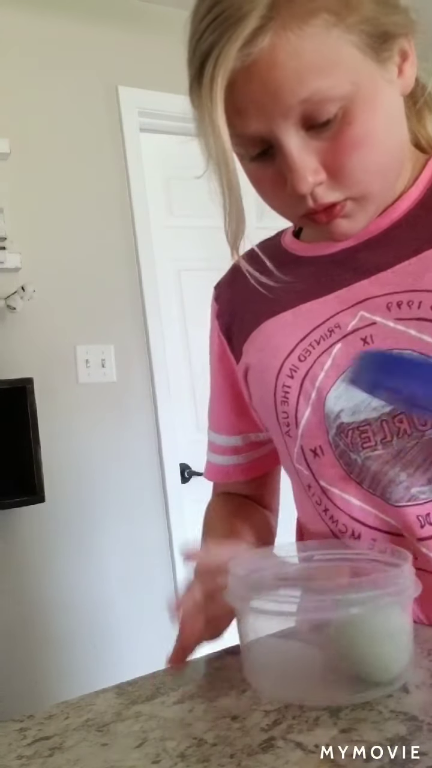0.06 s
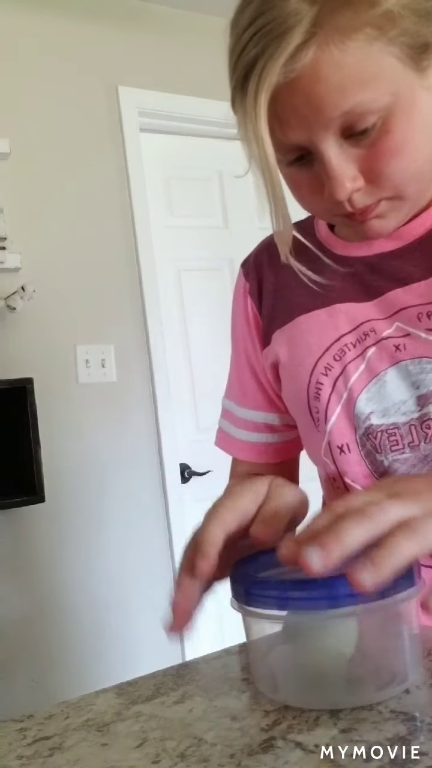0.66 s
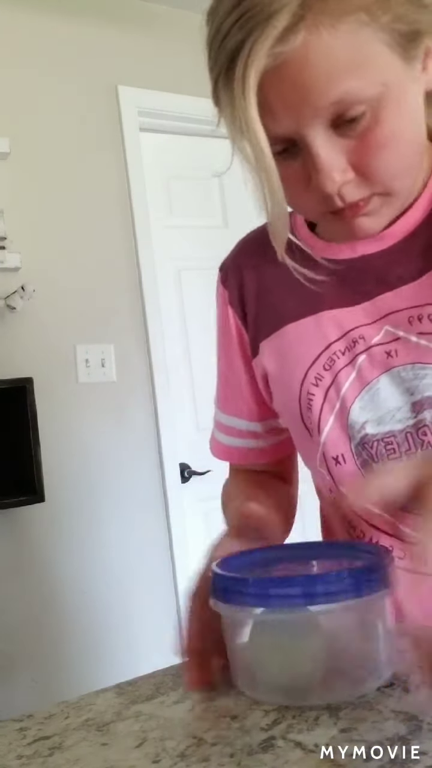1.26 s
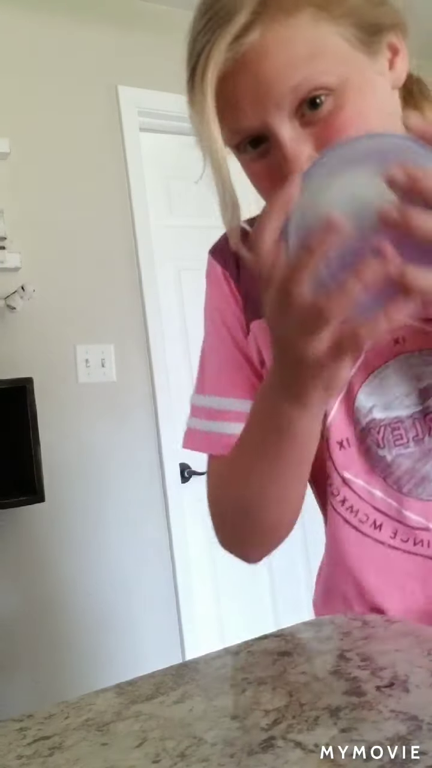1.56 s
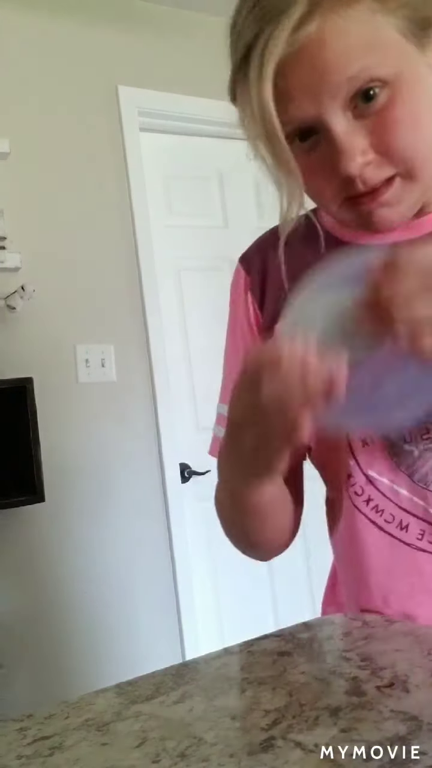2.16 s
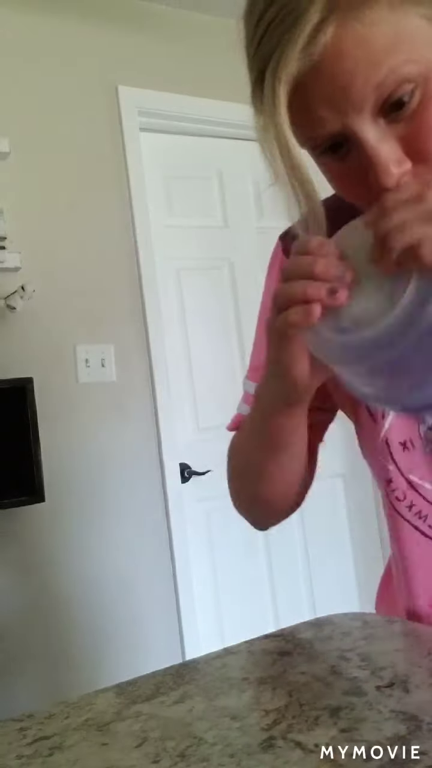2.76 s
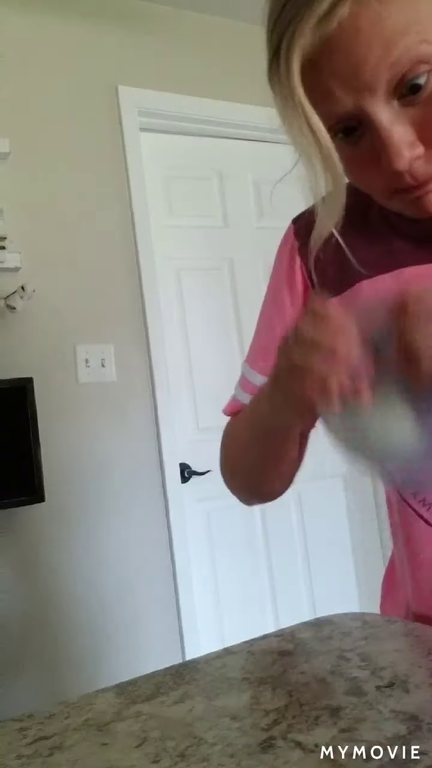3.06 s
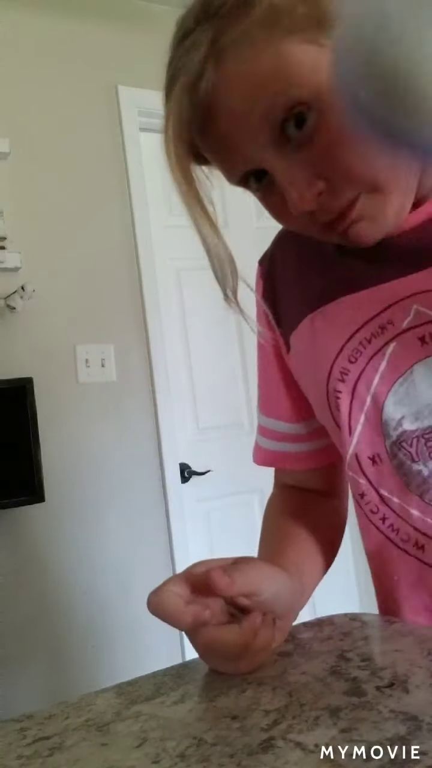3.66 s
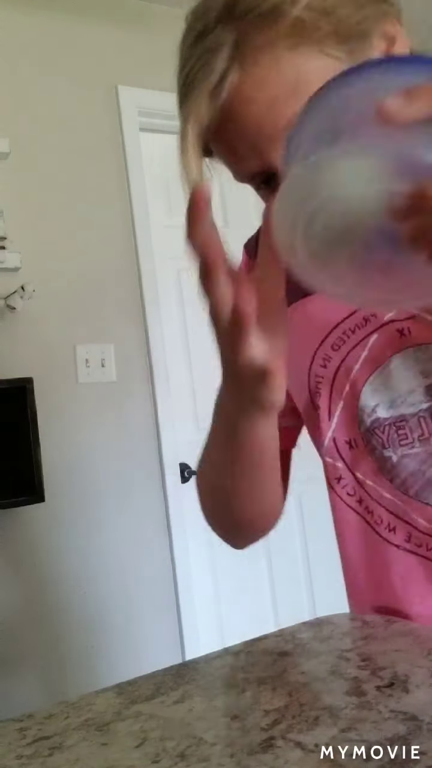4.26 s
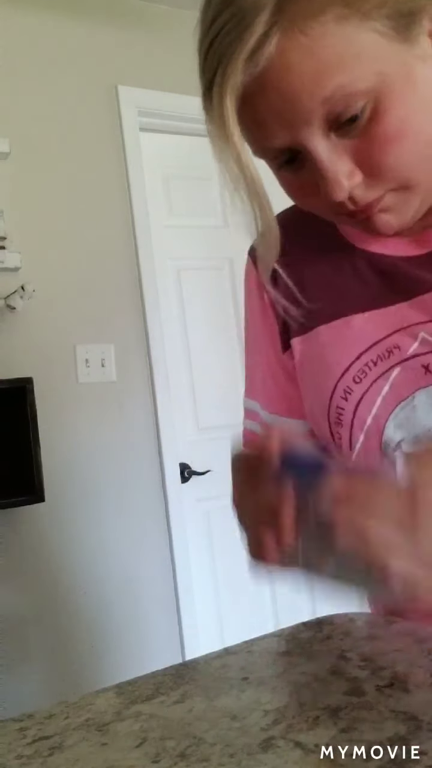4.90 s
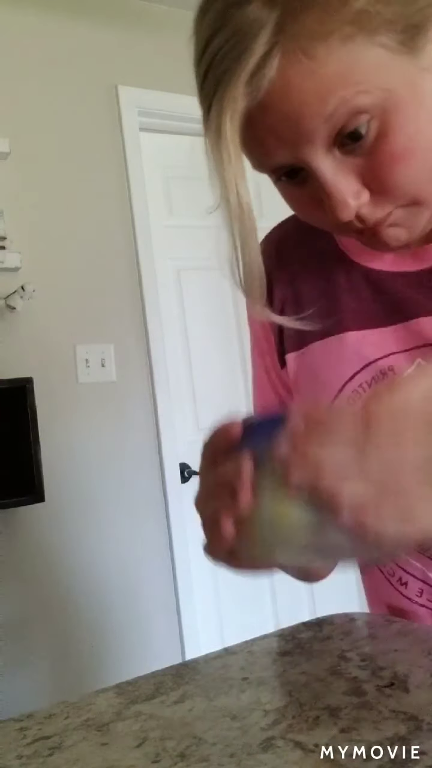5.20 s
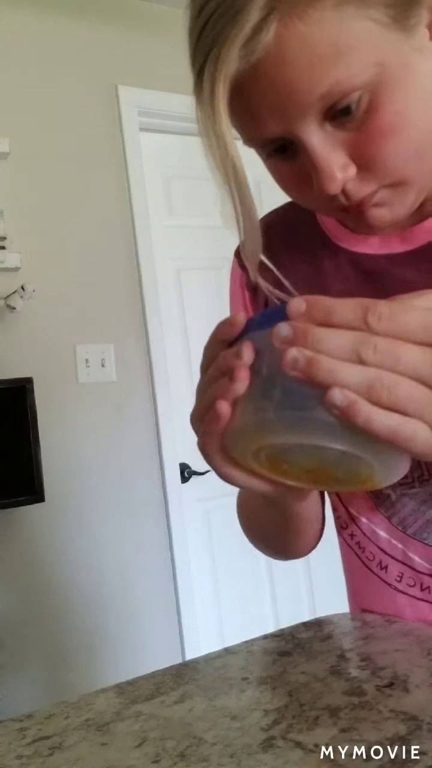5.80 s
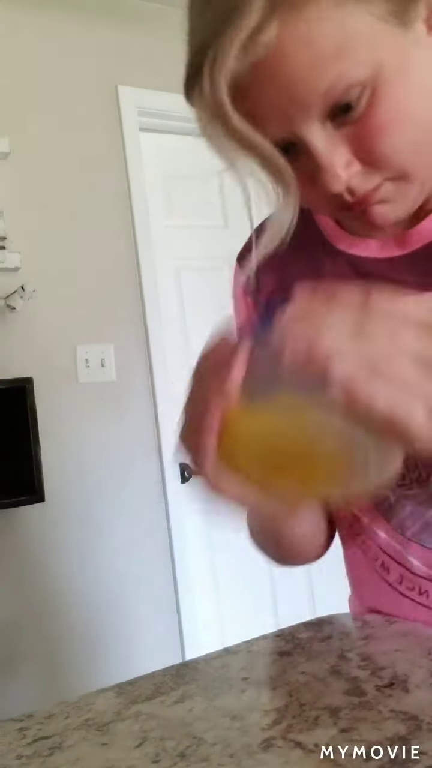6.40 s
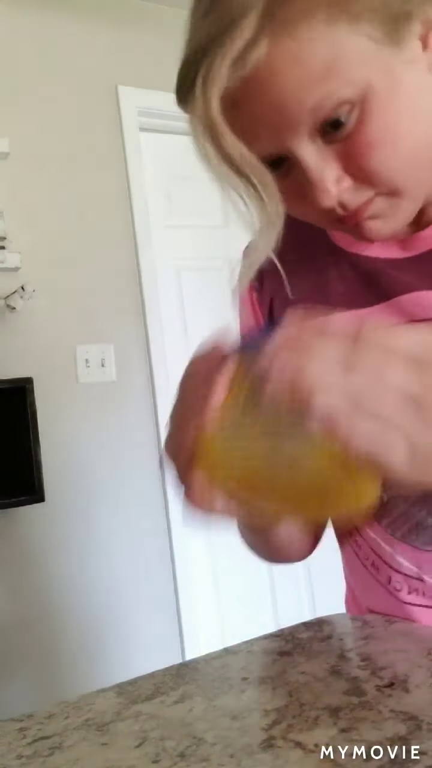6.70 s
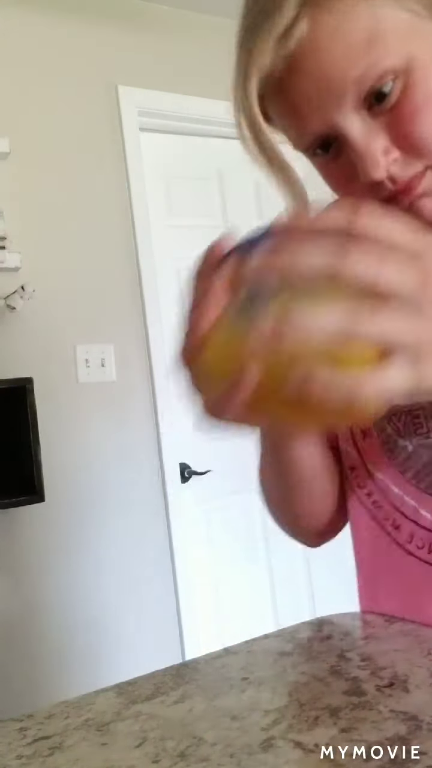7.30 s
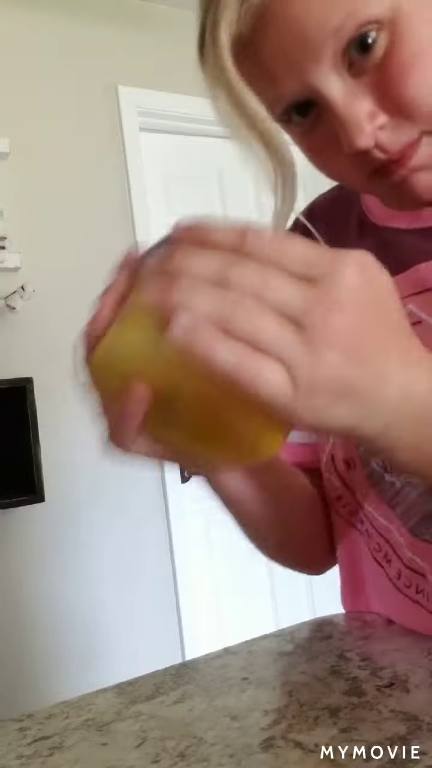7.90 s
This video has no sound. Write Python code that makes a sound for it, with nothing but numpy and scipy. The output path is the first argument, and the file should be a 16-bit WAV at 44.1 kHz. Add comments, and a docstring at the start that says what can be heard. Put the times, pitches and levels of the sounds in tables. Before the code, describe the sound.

Close by in a kitchen, a lid clicks and pops onto a plastic tub on a stone counter and is slapped shut. A raw egg is then shaken hard inside, its shell clacking rapidly and unevenly against the walls. About halfway through it cracks and bursts, and the knocks turn into hollow, wet thumps with small splashes and crunching shell pieces. The room adds a short reverberation.

```python
"""In a kitchen, close by, a lid is set on a plastic tub on a stone counter and slapped shut; then a
raw egg is shaken inside. Each impact excites damped modes of the tub. At first the hard shell
clacks against the walls: short contact, bright sound. Once it has burst, the liquid thumps the
bottom and the lid like a small drum, with splashes of resonating bubbles and a crunch of shell
pieces. The enclosed air rings along, and the room adds a short reverberation."""
import sys
import numpy as np
from scipy import signal
from scipy.fft import rfft, irfft, next_fast_len
from scipy.io import wavfile

SR = 44100
rng = np.random.default_rng(int(sys.argv[2]) if len(sys.argv) > 2 else 0)


def waveform_to_disk(signal):
    """Save audio, clipped to [-1, 1], as 16-bit WAV at the path in sys.argv[1]."""
    frames = np.transpose(np.atleast_2d(signal))
    scaled = np.clip(frames, -1, 1) * 32767
    samples = np.round(scaled).astype(np.int16)
    wavfile.write(sys.argv[1], SR, samples)


N = 355005
TIME = np.arange(N) / SR
AGE = np.arange(int(.2 * SR)) / SR  # seconds since the onset of one short sound


def from_db(db):
    """Amplitude ratio of a level in decibels."""
    return 10 ** (np.asarray(db) / 20)


def rms_one(x):
    """Normalisation to unit mean power."""
    return x / np.sqrt(np.mean(x ** 2) + 1e-20)


def at_level(x, db):
    """Energy normalisation: spread over 10 ms, the sound would have this level."""
    return from_db(db) * x / np.sqrt(np.sum(x ** 2) / (SR / 100) + 1e-20)


def add(track, start_s, sound):
    """Superposition of a sound on the track."""
    i = int(start_s * SR)
    track[i:i + len(sound)] += sound[:N - i]


def fade(t60_s, rise_s):
    """Exponential decay after a smooth onset."""
    return (1 - np.exp(-(AGE / rise_s) ** 2)) * np.exp(-np.log(1000) * AGE / t60_s)


def coloured(x, spectrum):
    """Spectral shaping by a curve of (frequency_hz, gain_db)."""
    hz, db = np.transpose(spectrum)
    size = next_fast_len(len(x))
    freqs = np.maximum(np.fft.rfftfreq(size, 1 / SR), 1)
    gain = from_db(np.interp(np.log(freqs), np.log(hz), db))
    return irfft(rfft(x, size) * gain, size)[:len(x)]


def unevenness(per_s, spread_db):
    """Random modulation: a factor that wanders as a contact tightens and slackens."""
    steps = rng.normal(0, spread_db, int(N / SR * per_s) + 2)
    return from_db(np.interp(TIME * per_s, np.arange(len(steps)), steps))


def grains(per_s, spread_db, size):
    """A Poisson process of tiny snaps of uneven strength."""
    born = rng.random(size) < per_s / SR
    signs = rng.choice([-1, 1], size)
    return born * signs * from_db(spread_db * np.minimum(rng.exponential(1, size), 4))


def resonate(x, hz, width_hz):
    """A second-order resonance with unit peak gain."""
    r = np.exp(-np.pi * width_hz / SR)
    feedback = [1, -2 * r * np.cos(2 * np.pi * hz / SR), r * r]
    return signal.lfilter(np.array([1, 0, -1]) * (1 - r * r) / 2, feedback, x)


def gliding_resonance(x, curve, width_hz):
    """A time-varying resonance: it follows (time_s, pitch_hz) and wavers with the grip of the hands."""
    hz = np.interp(TIME, *np.transpose(curve)) * unevenness(per_s=12, spread_db=.5)
    carrier = np.exp(2j * np.pi * np.cumsum(hz) / SR)
    r = np.exp(-np.pi * width_hz / SR)
    return 2 * np.real(carrier * signal.lfilter([1 - r], [1, -r], x / carrier))


def struck(modes, tuning, rise_s, sag=0):
    """Modal ringing: the contact point weights and damps each mode; a moving load bends the pitch."""
    strengths, dampings = np.exp(rng.normal(0, [[.3], [.2]], (2, len(modes))))
    turns = tuning * np.cumsum(1 + sag * (np.exp(-AGE / .0072) - .5)) / SR
    return sum(strength * from_db(db) * np.sin(2 * np.pi * f * turns) * fade(t60_s / damping, rise_s)
               for strength, damping, (f, db, t60_s) in zip(strengths, dampings, modes))


def bubbles(delays_s, pitches_hz, cycles):
    """Bubble resonance: each falls 60 dB in `cycles` periods and rises a little in pitch as it opens."""
    turns = np.maximum(AGE - delays_s[:, None], 0) * pitches_hz[:, None]
    strengths = from_db(rng.normal(0, 4, (len(delays_s), 1)))
    bend = 1 + .05 * np.minimum(turns / cycles, 1)
    decay = np.exp(-np.log(1000) * turns / cycles)
    return np.sum(strengths * np.sin(2 * np.pi * turns * bend) * decay, axis=0)


# Spectrum of the still room: frequency_hz, gain_db
AIR_SPECTRUM = [(40, -13), (180, -26.5), (460, -4.5), (900, -25), (4200, -19.5), (6000, -25.5),
                (16000, -37.5)]
def room_air():
    """Stationary broadband noise: the still air of the room."""
    return from_db(-79) * rms_one(coloured(rng.standard_normal(N), AIR_SPECTRUM))


# Spectrum of a faint rumble at the start: frequency_hz, gain_db
LOW_SPECTRUM = [(25, -19.5), (60, 5), (100, 0), (180, -1.5), (900, -72)]
def low_rumble(start_db=-63, fall_db_per_s=16):
    """Low-frequency noise in exponential decay."""
    noise = rms_one(coloured(rng.standard_normal(N), LOW_SPECTRUM))
    return noise * from_db(start_db - fall_db_per_s * TIME)


# Spectrum of the diffuse tail: frequency_hz, gain_db
TAIL_SPECTRUM = [(80, 2), (200, 5.5), (400, 2.5), (700, -4.5), (1100, -1.5), (3000, 2), (7000, 0),
                 (15000, 4.5)]
# Echoes from body, counter and cupboards: delay_s, gain_db
REFLECTIONS = [(.0036, -29), (.0068, -21.5), (0.0115, -14), (0.017, -19.5)]
def kitchen(x, t60_s, treble_t60_s, tail_db):
    """Reverberation: direct sound, early reflections and a diffuse tail whose treble dies first."""
    t = TIME[:int(.6 * SR)]
    noise = coloured(rng.standard_normal(len(t)), TAIL_SPECTRUM)
    low = signal.sosfiltfilt(signal.butter(2, 5000, fs=SR, output="sos"), noise)
    tail = low * from_db(-60 * t / t60_s) + (noise - low) * from_db(-60 * t / treble_t60_s)
    tail *= 1 - np.exp(-(t / .0051) ** 2)
    response = from_db(tail_db) * tail / np.sqrt(np.sum(tail ** 2))
    response[0] = 1
    for delay_s, db in REFLECTIONS:
        response[int(delay_s * SR)] += from_db(db)
    return signal.fftconvolve(x, response)[:N]


# Hollow tone of the tub: time_s, pitch_hz
CAVITY_PITCH = [(3.3, 582), (4.2, 477.6), (4.6, 450.7)]
def tub_cavity(x):
    """Cavity resonance: the enclosed air rings on, sinking as the egg spreads over the walls."""
    ringing = x + from_db(-3.5) * gliding_resonance(x, CAVITY_PITCH, width_hz=20)
    bass_loss = signal.butter(1, 110, "high", fs=SR, output="sos")  # a small tub radiates little bass
    return signal.sosfilt(bass_loss, ringing)


# Spectrum of hard contacts on shell and plastic: frequency_hz, gain_db
BRITTLE_SPECTRUM = [(900, -37.5), (1600, -2.5), (2400, -0.5), (3900, 0), (5500, -1.5), (7400, -2.5),
                    (8500, -14), (9600, -15.5), (11300, -9), (13500, -17.5), (16000, -21)]
def brittle(x):
    """Brief, hard contacts carry their energy mainly in the treble."""
    return coloured(x, BRITTLE_SPECTRUM)


def crack(hz, envelope, ring_db=10.5, width_hz=275):
    """Brittle snaps excite one damped resonance, by default as sharp as that of a piece of shell."""
    snaps = brittle(grains(per_s=14000, spread_db=.98, size=len(AGE)))
    return (snaps + from_db(ring_db) * resonate(snaps, hz, width_hz)) * envelope


# Spectrum of the slapped tub: frequency_hz, gain_db
SLAP_SPECTRUM = [(400, -21.5), (620, 12.5), (950, -0.5), (1280, -1), (1600, -19), (2600, -25.5),
                 (5000, -43)]
def slap(t60_s, rise_s):
    """Modal overlap: the crowded, heavily damped middle modes of the tub merge into noise."""
    return coloured(rng.standard_normal(len(AGE)), SLAP_SPECTRUM) * fade(t60_s, rise_s)


# Modes of the lid and the loaded bottom: pitch_ratio, level_db, t60_s
DRUM_MODES = [(0.691, -9, 0.097), (0.998, 16.5, 0.034), (1.379, -3.5, 0.057)]
def drum(hz, rise_s, sag=0, decay_scale=1):
    """Inharmonic modes: an end of the tub vibrates like a small drumhead."""
    modes = [(ratio, db, t60_s * decay_scale) for ratio, db, t60_s in DRUM_MODES]
    return struck(modes, hz, rise_s, sag)


# Spectrum of the rubbed wall: frequency_hz, gain_db
RUB_SPECTRUM = [(40, -32), (130, -15.5), (260, -1.5), (480, 1.5), (1100, -12.5), (5000, -36)]
# Rubbing and rolling of hands, lid and contents: start_s, end_s, rumble_db, swish_db
RUBS = [(0, 0.111, -64.5, -60.5), (0.382, 0.5, -44, -48), (1.187, 1.417, -53, -58),
        (1.548, 1.658, -69, -67), (1.698, 2.31, -54.5, -61), (2.382, 3.247, -51, -57),
        (3.356, 3.444, -51.5, -57), (3.464, 3.751, -43.5, -52.5), (3.83, 4.294, -49.5, -58),
        (4.414, 4.6, -58, -61), (4.612, 4.664, -38.5, -40), (4.794, 5.447, -54.5, -61),
        (6.02, 6.127, -67.5, -72), (6.163, 8.05, -50.5, -58)]
def rubbing(attack_s=.0038, release_db_per_s=136.5):
    """Sliding friction under uneven pressure gives a low rumble and a soft, grainy swish."""
    pressure = unevenness(per_s=60, spread_db=3)
    rumble = rms_one(coloured(rng.standard_normal(N), RUB_SPECTRUM) * pressure)
    grit = brittle(grains(per_s=4000, spread_db=3.5, size=N))
    swish = rms_one(grit * pressure * unevenness(per_s=200, spread_db=1.5))
    out = np.zeros(N)
    for start_s, end_s, rumble_db, swish_db in RUBS:
        attack = np.clip((TIME - start_s) / attack_s, 0, 1)
        release = from_db(-release_db_per_s * np.maximum(TIME - end_s, 0))
        out += attack * release * (from_db(rumble_db) * rumble + from_db(swish_db) * swish)
    return out


# Chains of bubbles: start_s, length_s, first_hz, last_hz, level_db
BUBBLE_CHAINS = [(2.26, 0.034, 590, 1400, -50), (2.929, 0.022, 625, 1340, -43),
                 (3.069, 0.032, 625, 1310, -42), (3.606, 0.049, 2310, 1106, -48.5)]
def squelches(count=12, gain_db=7.5):
    """A liquid film squeezed along the wall sheds a gliding run of bubble resonances."""
    out = np.zeros(N)
    for start_s, length_s, first_hz, last_hz, db in BUBBLE_CHAINS:
        along = np.linspace(0, 1, count) + rng.normal(0, .04, count)
        pitches = first_hz * (last_hz / first_hz) ** along * np.exp(rng.normal(0, .05, count))
        add(out, start_s, at_level(bubbles(along * length_s, pitches, cycles=11), db + gain_db))
    return out


PIECE_HZ = 3006  # tone of the shell pieces under an average slap
# Ticks of loose bits: start_s, level_db
TICKS = [(4.1432, -42.5), (4.339, -41.5), (4.8223, -38.5), (5.0525, -44), (6.3965, -43.5), (6.659, -34.5),
         (7.1013, -48), (7.4225, -44.5), (7.5778, -36.5), (7.669, -47)]
def loose_bits():
    """Light impacts: single pieces of wet shell tick on the wall and ring briefly."""
    out = np.zeros(N)
    for start_s, db in TICKS:
        tick = crack(PIECE_HZ * rng.uniform(1, 2), fade(t60_s=.017, rise_s=.00032))
        add(out, start_s, at_level(tick, db))
    return out


# Tone of the lid, falling as it closes the air in: time_s, pitch_hz
LID_TONE = [(.19, 1030), (.31, 810), (.336, 650), (.49, 560), (.58, 535), (1.01, 428)]
def lid_scrape(start_s=.375, end_s=.51, level_db=-39.5):
    """Stick-slip friction: the lid twists along the rim, and each slip rings its hollow tone."""
    slips = grains(per_s=120, spread_db=1, size=N) * (TIME > start_s) * (TIME < end_s)
    tone = gliding_resonance(slips, LID_TONE, width_hz=70)
    active_share = (end_s - start_s) * SR / N
    return from_db(level_db) * rms_one(tone) * np.sqrt(active_share)


# Modes of the stiff rim: nominal_hz, level_db, t60_s
RIM_MODES = [(2897, 3.5, 0.012), (3180, 5.5, 0.027), (4340, 9.5, 0.014), (5630, -0.5, 0.0073)]
# Modes of the tub under the seated lid: nominal_hz, level_db, t60_s
TUB_MODES = [(1036, 1, 0.018), (1390, -2.5, .015), (1700, -3.5, 0.013)]
# The lid meeting the rim: start_s, pop_db, click_db
LID_CONTACTS = [(.16, -31.5, -39), (.185, -36, -43.5), (.312, -34, -35.5), (.3285, -35.5, -23.5),
                (.336, -15, -29.5), (.345, -29, -34.5), (.422, -42, -50), (.439, -47.5, -59.5),
                (.492, -25.5, -33), (.532, -31, -40), (.548, -35.5, -53), (.581, -43.5, -53),
                (.989, -26, -25), (.996, -43.5, -26), (1.006, -26, -22.5), (1.018, -28, -35.5)]
def lid_closing(seated_s=.4):
    """Impulsive excitation: the lid pops and the rim clicks; once seated, the lid knocks the tub too."""
    out = np.zeros(N)
    for start_s, pop_db, click_db in LID_CONTACTS:
        pop = drum(np.interp(start_s, *np.transpose(LID_TONE)), rise_s=.00054)
        add(out, start_s, at_level(pop, pop_db))
        knock = struck(TUB_MODES, tuning=.95, rise_s=.0004)
        add(out, start_s, (start_s > seated_s) * at_level(knock, pop_db - 2))
        snap = brittle(rng.standard_normal(len(AGE))) * fade(t60_s=.025, rise_s=.0002)
        grip = np.exp(rng.normal(0, .04))  # the fingers retune the rim
        ring = struck(RIM_MODES, grip, rise_s=.0002)
        add(out, start_s, at_level(snap, click_db - 3) + at_level(ring, click_db - 2.5))
    return out


# Modes of the tub standing on the counter: nominal_hz, level_db, t60_s
COUNTER_MODES = [(96.1, -7.5, 0.039), (118, 4, 0.042), (156, -1.5, 0.074), (250, -3.5, 0.068),
                 (274, 0, .06), (359, 0, 0.12)]
# The palm driving the lid home: start_s, thud_db, buzz_db
PALM_BLOWS = [(0.989, -24.5, -27), (0.999, -27, -30), (1.013, -22, -21)]
def palm_blows():
    """A soft impact excites the low modes of the tub on the counter, with a buzz and a clap."""
    out = np.zeros(N)
    for start_s, thud_db, buzz_db in PALM_BLOWS:
        thud = struck(COUNTER_MODES, tuning=.99, rise_s=.0021)
        add(out, start_s, at_level(thud, thud_db))
        buzz = brittle(rng.standard_normal(len(AGE))) * fade(t60_s=.27, rise_s=.001)
        clap = slap(t60_s=.22, rise_s=.001)
        add(out, start_s, at_level(buzz, buzz_db) + at_level(clap, buzz_db - 2.5))
    return out


# Modes of the wall: nominal_hz, level_db, t60_s
WALL_MODES = [(253, 3.5, 0.051), (320, 11, 0.03), (397.5, 16.5, 0.026), (479, 16, 0.028), (620, 8.5, 0.045)]
# The hard shell striking the wall: start_s, crack_db, thump_db, ping_hz
SHELL_IMPACTS = [(1.2044, -32, -45, 6100), (1.3703, -24, -35.5, 2830), (1.5969, -31.5, -31.5, 2700),
                 (1.6447, -26.5, -43.5, 4840), (1.684, -19.5, -35.5, 5150), (1.766, -19, -33.5, 2170),
                 (1.8408, -22.5, -44, 2450), (1.8731, -23.5, -36.5, 4500), (1.8929, -32.5, -38.5, 2020),
                 (1.971, -23, -33.5, 2430), (2.0084, -14, -30.5, 5530), (2.1038, -25.5, -32.5, 3130),
                 (2.2189, -32.5, -55, 4360), (2.2404, -27, -39.5, 3220), (2.3128, -40, -51.5, 4460),
                 (2.3765, -24.5, -30, 7300), (2.389, -24.5, -51, 7500), (2.4031, -17, -25, 6000),
                 (2.4534, -13, -24.5, 4000), (2.473, -20.5, -29, 4600), (2.5299, -21, -38, 2420),
                 (2.589, -26.5, -33.5, 3740), (2.6192, -22.5, -30.5, 2200), (2.6644, -23.5, -42.5, 2080),
                 (2.7099, -28, -37.5, 2450), (2.7475, -25, -34.5, 2600), (2.7803, -20, -27, 6500),
                 (2.8288, -21.5, -31.5, 2330), (2.8687, -29.5, -31.5, 2470), (2.897, -27.5, -39.5, 2560),
                 (2.9174, -26.5, -35, 4700), (2.93, -27, -31.5, 6100), (2.986, -24, -32, 2600),
                 (3.026, -27, -35.5, 2440), (3.052, -20.5, -30, 3930), (3.0767, -25, -31, 3200),
                 (3.13, -24, -37.5, 2450), (3.1895, -32, -38.5, 3130), (3.2161, -27, -37.5, 2420),
                 (3.27, -31.5, -39, 3300), (3.3976, -20.5, -37, 2930), (3.4702, -12.5, -18.5, 5000),
                 (3.4992, -16, -31.5, 3320), (3.5055, -20, -30, 4940), (3.553, -22.5, -32, 3340),
                 (3.5928, -15.5, -29, 5850), (3.6289, -33.5, -35, 2650), (3.6704, -23.5, -36, 2400),
                 (3.684, -24.5, -31, 2520), (3.7061, -32, -50, 3000), (3.7863, -27, -46.5, 3300),
                 (3.858, -15, -25, 3270), (3.9067, -19.5, -43.5, 6000), (3.935, -20.5, -31.5, 3330),
                 (3.9889, -19, -32.5, 4800), (4.0754, -14.5, -45, 3980), (4.0779, -8, -19, 5930),
                 (4.1916, -16.5, -32, 3360), (4.2824, -18, -27.5, 3050), (4.6111, -33, -24.5, 3420),
                 (4.6137, -12.5, -26.5, 7050), (4.628, -19.5, -36.5, 8000)]
def shell_knocks(crack_gain_db=-14, thump_gain_db=-1, knock_hz=782):
    """Short contact, wide spectrum: a crack and a little crumbling over the dull thump of the wall."""
    out = np.zeros(N)
    crumbling = from_db(-21.5) * fade(t60_s=.027, rise_s=.00098)
    envelope = fade(t60_s=.0027, rise_s=.00063) + crumbling
    mean_thump_db = np.mean(SHELL_IMPACTS, axis=0)[2]
    for start_s, crack_db, thump_db, ping_hz in SHELL_IMPACTS:
        grip = np.exp(rng.normal(0, .1))  # the hands retune the wall
        thump = struck(WALL_MODES, grip, rise_s=.0011)
        add(out, start_s, at_level(thump, thump_db + thump_gain_db))
        knock = np.sin(2 * np.pi * knock_hz * grip ** 2 * AGE) * fade(t60_s=.013, rise_s=.00026)
        add(out, start_s, at_level(knock, -40 + .45 * (thump_db - mean_thump_db)))
        clack = crack(ping_hz, envelope, ring_db=9, width_hz=190)  # the plastic rings where it is hit
        add(out, start_s, at_level(clack, crack_db + crack_gain_db))
    return out


# The shell caves in, then bursts: start_s, level_db, t60_s
FRACTURES = [(4.08, -28.5, 0.036), (4.611, -26.5, 0.1)]
def shell_breaking():
    """Brittle fracture: cracks run through the shell in a dense, bright, dying crackle."""
    out = np.zeros(N)
    for start_s, db, t60_s in FRACTURES:
        crackle = brittle(grains(per_s=3700, spread_db=7.5, size=len(AGE)))
        crackle += from_db(11) * resonate(crackle, hz=7800, width_hz=1300)
        add(out, start_s, at_level(crackle * fade(t60_s, rise_s=.00064), db))
    return out


def air_pocket(length_s, low_hz, high_hz):
    """A shrinking cavity rises in pitch: air trapped under the liquid chirps until it closes."""
    progress = np.minimum(AGE / length_s, 1)
    phase = 2 * np.pi * np.cumsum(low_hz + (high_hz - low_hz) * progress) / SR
    return np.sin(phase) * np.sin(np.pi * np.sqrt(progress))


def shell_clump(tone_hz):
    """Many tiny impacts merge into the ragged crunch of a clump of shell pieces."""
    knots = AGE[::50]
    ragged = from_db(np.interp(AGE, knots, rng.normal(0, 5, len(knots))))
    return crack(tone_hz * np.exp(rng.normal(0, .16)), ragged * fade(t60_s=.024, rise_s=.00052))


def spatter(lag_s, count=10):
    """Drops ring as bubbles just after the bulk lands; each landing favours one size, hence one pitch."""
    delays = lag_s * rng.gamma(3, 1, count)
    typical_hz = np.exp(rng.uniform(np.log(1700), np.log(5500)))
    pitches = typical_hz * np.exp(rng.normal(0, .35, count))
    return bubbles(delays, pitches, cycles=14)


# Tone of the froth: time_s, typical_hz
FROTH_PITCH = [(5.3, 995), (6.3, 2570)]
def froth(start_s, lag_s=.017, count=10):
    """Smaller bubbles ring higher: air beaten into the egg pops in an ever finer froth."""
    typical_hz = np.interp(start_s, *np.transpose(FROTH_PITCH))
    pitches = typical_hz * np.exp(rng.normal(0, .35, count))
    return bubbles(lag_s * rng.gamma(2, 1, count), pitches, cycles=20)


# Crunch of an average landing as the shell is ground into more pieces: time_s, level_db
CRUNCH_GROWTH = [(4.3, -54), (5.4, -46.5), (6.2, -41.5), (8, -40.5)]
# The burst egg landing at each end of a stroke: start_s, boom_db, pitch_hz, slap_db
LANDINGS = [(4.085, -15, 412, -35), (4.287, -29.5, 444, -39), (4.338, -24, 441, -44),
            (4.427, -33, 453, -48.5), (4.6, -26.5, 362, -21), (4.6125, -11.5, 404, -18.5),
            (4.623, -21, 446, -38.5), (4.796, -20.5, 402, -34.5), (4.817, -27, 388, -41),
            (4.888, -17.5, 443, -21.5), (5.018, -20, 486, -39), (5.051, -25, 390, -42),
            (5.107, -13.5, 408, -21), (5.214, -20.5, 397, -40.5), (5.22, -14.5, 419.6, -28.5),
            (5.284, -14, 447, -23), (5.364, -18, 394, -33.5), (5.421, -19, 392, -38.5),
            (5.505, -27.5, 370, -76.5), (5.557, -25.5, 428, -49), (6.063, -24, 377, -52),
            (6.142, -15.5, 391, -29), (6.148, -28, 363, -20), (6.271, -11.5, 387, -36.5),
            (6.344, -15, 429, -26.5), (6.429, -12.5, 367, -35.5), (6.503, -18.5, 363, -19),
            (6.599, -10, 369, -44.5), (6.651, -19, 375, -25), (6.73, -13, 371, -46.5),
            (6.784, -20, 393, -20), (6.874, -20, 496, -36), (6.923, -20.5, 354, -37),
            (7.025, -13.5, 379, -44.5), (7.084, -27.5, 363, -30.5), (7.2, -19, 387, -37),
            (7.251, -20, 370, -30), (7.339, -15.5, 528, -44.5), (7.408, -27.5, 364, -33),
            (7.505, -14.5, 335, -57.5), (7.584, -20, 399, -27.5), (7.676, -10.5, 386, -28),
            (7.726, -11, 360, -33), (7.805, -21, 520, -51.5), (7.857, -16, 384, -27),
            (7.959, -21, 358, -44.5), (8.014, -25.5, 540, -30.5)]
def wet_knocks(hardening=.23, octaves_per_db=.6, late_loss_db_per_s=409):
    """Liquid impact drives the tub like a drum; shell and drops follow, louder for a harder landing."""
    out = np.zeros(N)
    times, booms, _, slaps = np.transpose(LANDINGS)
    force_db = .38 * booms + .4 * slaps
    crunches = np.interp(times, *np.transpose(CRUNCH_GROWTH)) + force_db - force_db.mean()
    for (start_s, boom_db, hz, slap_db), crunch_db in zip(LANDINGS, crunches):
        softness, pocket_tuning = np.exp(rng.normal(0, [.25, .1]))
        # the contact shortens as the slap gains on the boom
        softness *= from_db(-hardening * (slap_db - boom_db - np.mean(slaps - booms)))
        held = min(1, (450 / hz) ** 4)  # the highest notes come from spots that the fingers damp
        boom = drum(hz, rise_s=.0023 * softness * held, sag=rng.normal(.1, .13), decay_scale=held)
        wall = struck(WALL_MODES, tuning=1, rise_s=.00072)
        add(out, start_s, at_level(boom, boom_db - 7) + at_level(wall, boom_db - 21))
        chirp = air_pocket(.00536 * softness, 520 * pocket_tuning, 1500 * pocket_tuning)
        smack = slap(t60_s=.02, rise_s=.0067)
        add(out, start_s, at_level(chirp, slap_db - 5.5) + at_level(smack, slap_db - 8))
        tone_hz = PIECE_HZ * 2 ** (octaves_per_db * (slap_db - slaps.mean()))  # harder rings higher
        for lag_s in np.array([0, .003, .007]) * softness:
            clump_db = crunch_db - late_loss_db_per_s * lag_s
            add(out, start_s + lag_s, at_level(shell_clump(tone_hz), clump_db))
        add(out, start_s, at_level(spatter(lag_s=.0028 * softness), crunch_db + 2))
        add(out, start_s, at_level(froth(start_s), crunch_db - 11))
    return out


def scene():
    """Superposition of the closing and the shaking, each reverberated, over the room's background."""
    closing = lid_closing() + palm_blows() + lid_scrape()
    on_counter = kitchen(closing, t60_s=.46, treble_t60_s=.33, tail_db=-6.5)
    shaking = shell_knocks() + shell_breaking() + wet_knocks() + loose_bits() + squelches() + rubbing()
    in_hands = kitchen(tub_cavity(shaking), t60_s=.37, treble_t60_s=.25, tail_db=-10.5)
    return (on_counter + in_hands + room_air() + low_rumble())[None]


def record(dry):
    """Band limiting: a steep low-pass removes the treble above 16.2 kHz."""
    return signal.sosfilt(signal.ellip(10, .2, 70, 16200, fs=SR, output="sos"), dry)


dry = scene()
out = record(dry)
waveform_to_disk(out)
```